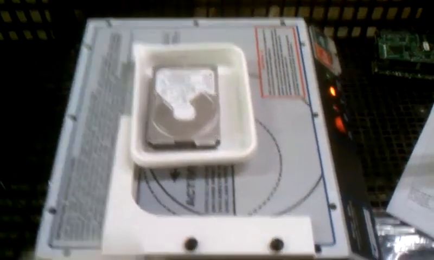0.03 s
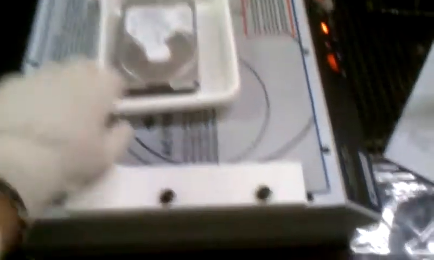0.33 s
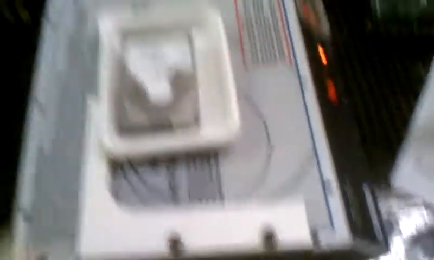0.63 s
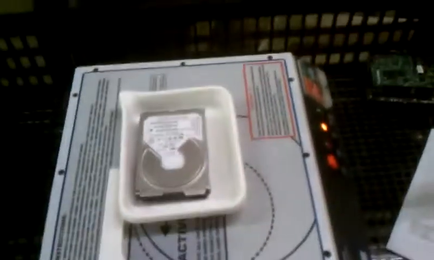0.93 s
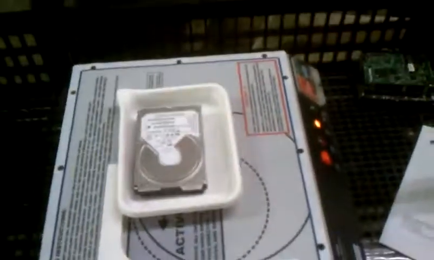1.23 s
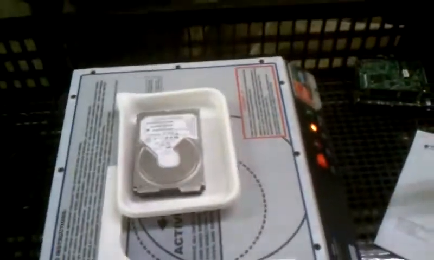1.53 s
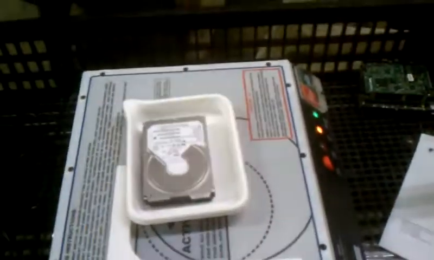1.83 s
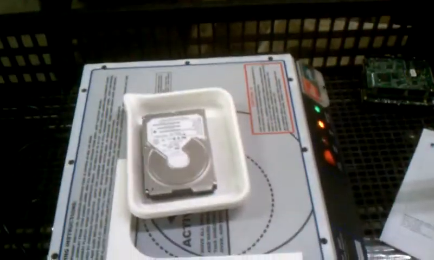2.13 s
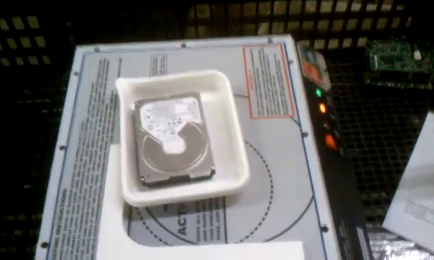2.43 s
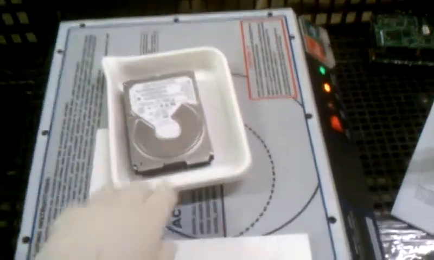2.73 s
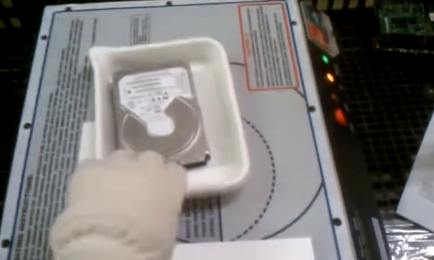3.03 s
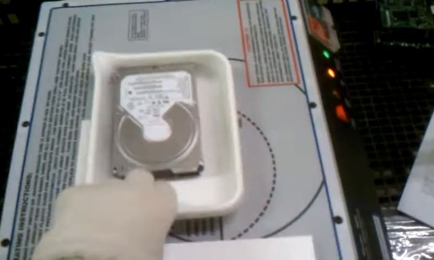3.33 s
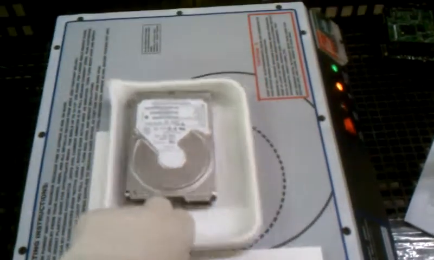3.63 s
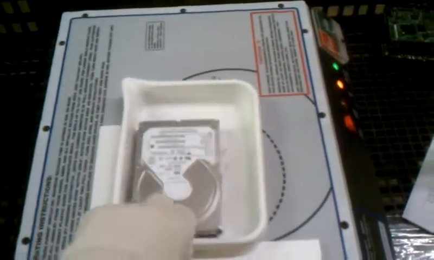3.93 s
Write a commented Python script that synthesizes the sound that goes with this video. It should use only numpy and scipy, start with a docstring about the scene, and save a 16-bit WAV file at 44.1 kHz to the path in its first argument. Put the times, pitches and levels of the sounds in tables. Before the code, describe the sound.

A rattling electric buzz starts with a thump over a whirring fan, as a magnet shakes a hard drive in a plastic tray. The buzz evens out, then the tray is dragged with scrapes and knocks, heard close in a small office.

```python
"""A cooling fan whirs in an idling bench degausser. Its mains magnet switches on with a thump and a hum,
and a hard drive in a plastic tray chatters in the field, settling into an even buzz.
A hand then drags the tray over the deck: it sticks and slips, and the drive knocks against its wall.
A narrow-band microphone is close by, in a small office."""
import sys
import numpy as np
from scipy import signal
from scipy.fft import rfft, irfft
from scipy.io import wavfile
from scipy.ndimage import uniform_filter1d

SR = 44100
rng = np.random.default_rng(int(sys.argv[2]) if len(sys.argv) > 2 else 0)


def file_out(sig):
    """Save sig as 16-bit WAV at sys.argv[1]."""
    # one column per channel
    cols = np.atleast_2d(sig).T
    # limit, then scale
    lim = np.clip(cols, -1, 1)
    pcm = np.round(lim * 32767).astype(np.int16)
    wavfile.write(sys.argv[1], SR, pcm)


N = 176400

MAINS_HZ, SWITCH_ON_S, FIELD_RISE_S = 60.05, 1.602, 0.016
STRIKE_HZ, STRIKE_PHASE_CYCLES = 2 * MAINS_HZ, 0.4
# strength of the drive's rocking (time [s], level [dB])
ROCKING_LEVEL = [(1.6, -11.5), (1.8, -14.5), (2.08, -15), (2.15, -1.5), (2.22, -4), (2.3, -8), (2.39, 2),
                 (2.423, -8.5), (2.455, 4.5), (2.49, -5), (2.53, -1.5), (2.7, -0.5), (2.93, -0.5),
                 (2.99, -21.5), (4, -32)]
# ring of the drive casing (frequency [Hz], relative density [dB])
CASING_SPECTRUM = [(100, -10.5), (300, -1.5), (480, -7.5), (560, 1.5), (720, -2), (950, -2), (1250, 6),
                   (1550, 0), (1900, 6.5), (2200, 5.5), (2450, 5), (2800, -2), (3350, 5.5), (3700, -7),
                   (4050, -19.5), (4500, -37.5)]


def undb(db):
    """Decibels to gain."""
    return 10 ** (np.asarray(db) / 20)


def unit(x):
    """Scale to rms 1."""
    return x / np.sqrt(np.mean(x ** 2))


def curve(rows):
    """Join (time [s], value) rows by straight lines."""
    return np.interp(np.arange(N) / SR, *np.array(rows).T)


def walk(rate_hz):
    """Smooth random drift, rms 1."""
    hold = int(SR / rate_hz)
    steps = np.repeat(rng.standard_normal(N // hold + 1), hold)
    return unit(uniform_filter1d(uniform_filter1d(steps, hold), hold)[:N])


def colour(x, spectrum):
    """Minimum-phase filter of unit energy through (frequency [Hz], level [dB]) rows."""
    size = 8192
    hz, db = np.array(spectrum).T
    bins_hz = np.arange(size // 2 + 1) * SR / size
    gain_db = np.interp(np.log(bins_hz + 1), np.log(hz), db)
    cepstrum = irfft(np.log(undb(gain_db)))
    cepstrum[1:size // 2] *= 2
    cepstrum[size // 2 + 1:] = 0
    response = irfft(np.exp(rfft(cepstrum)))
    return signal.fftconvolve(x, response / np.linalg.norm(response))[:N]


def tail(x, t60_s):
    """Dense, decaying reflections."""
    decay = np.exp(-np.log(1000) * np.arange(SR // 2) / SR / t60_s)
    response = rng.standard_normal(SR // 2) * decay
    return signal.fftconvolve(x, response / np.linalg.norm(response))[:N]


def pulses(times_s, sizes):
    """One click of the given size at each time."""
    return np.bincount(np.clip(times_s * SR, 0, N).astype(int), sizes, N + 1)[:N]


def bursts(clicks, decay_s):
    """Turn each click into exponentially decaying noise."""
    envelope = signal.lfilter([1], [1, -np.exp(-1 / (decay_s * SR))], clicks)
    return envelope * rng.standard_normal(N)


def fan(t):
    """Wavering blade tones and a throbbing whine over rushing air, with a fluttering high whirr."""
    # blade tones (frequency [Hz], relative level [dB])
    blade_tones = [(161.8, -52), (170.7, -49), (254.5, -50), (510.5, -48.5), (1274, -59.5)]
    # main whine (time [s], relative level [dB])
    whine_level = [(0, -52), (.3, -47.5), (.6, -42), (.9, -48.5), (1.2, -45), (1.52, -44), (1.65, -44),
                   (4, -53)]
    # rushing air (frequency [Hz], relative density [dB])
    air_spectrum = [(25, -32.5), (50, -16), (85, -6), (150, -3), (260, 0.5), (380, 0), (490, 1.5),
                    (570, -8.5), (700, -2.5), (800, 3), (900, -1), (1050, -6), (1270, -7), (1650, -9.5),
                    (1950, -7), (2200, -7.5), (2400, -6), (2700, -8), (3000, -6), (3280, -6.5), (3550, -15),
                    (4000, -25), (4500, -46)]
    # fan level as the microphone moves (time [s], gain [dB])
    proximity = [(0, -2), (.4, 0.1), (.7, -0.5), (1.3, -1), (4, -3)]
    whine_hz, throb_hz, throb_db = 763, 13, 4
    waver_db, whirr_band_hz = 3, [3110, 3450]

    def tone(hz, db):
        gain = np.sqrt(2) * undb(db + waver_db * walk(14))
        drifting_hz = hz * (1 + 0.003 * walk(12))
        return gain * np.sin(2 * np.pi * np.cumsum(drifting_hz) / SR)

    tones = sum(tone(hz, db) for hz, db in blade_tones)
    tones += tone(whine_hz, curve(whine_level) + throb_db * np.sin(2 * np.pi * throb_hz * t))
    air = colour(rng.standard_normal(N), air_spectrum) * undb(-39 + 0.5 * walk(24))
    band = signal.butter(4, whirr_band_hz, "band", fs=SR, output="sos")
    whirr = unit(signal.sosfilt(band, rng.standard_normal(N))) * undb(-55 + 3.2 * walk(25))
    return undb(curve(proximity)) * (undb(-0.86) * tones + air + whirr)


def hum(t, looseness):
    """Coil hum surges at switch-on; the rocking drive drones, unsteady if loose, and shakes the bench."""
    # hum of coil and case (mains multiple, level [dB])
    coil_harmonics = [(1, -64), (2, -48), (4, -56.5), (6, -42.5), (8, -38.5), (10, -53), (12, -58.5)]
    # drive rocking on the deck (mains multiple, relative level [dB])
    drone_harmonics = [(2, -36.5), (3, -27.5), (4, -44), (5, -36.5), (6, -43), (7, -50.5), (8, -38),
                       (10, -47)]
    # bench rumble (frequency [Hz], relative density [dB])
    bench_spectrum = [(20, -26.5), (60, -8.5), (110, 5), (250, 3.5), (500, -14), (1500, -49.5)]
    surge_db, surge_s, slip_s = 6, 0.07, 0.0005
    phases = rng.uniform(0, 2 * np.pi, size=16)

    def stack(harmonics, waver_db, clock_s):
        total = np.zeros(N)
        for k, db in harmonics:
            gain = np.sqrt(2) * undb(db + waver_db * looseness * walk(21.69))
            total += gain * np.sin(2 * np.pi * k * MAINS_HZ * clock_s + phases[round(k)])
        return total

    surge = undb(surge_db * np.exp(-np.abs(t - SWITCH_ON_S) / surge_s))
    bench = undb(-38) * colour(rng.standard_normal(N), bench_spectrum)
    drone = stack(drone_harmonics, waver_db=3.5, clock_s=t + slip_s * looseness ** 2 * walk(35))
    coil = stack(coil_harmonics, waver_db=2.5, clock_s=t)
    return surge * coil + undb(curve(ROCKING_LEVEL)) * (drone + bench)


def chatter(t, looseness):
    """The drive strikes and bounces each half cycle, shaking the tray; rocking weakens alternate hits."""
    # casing chatter (time [s], level [dB])
    casing_level = [(1.6, -29.5), (1.68, -33), (1.74, -26), (1.79, -31.5), (2.1, -30.5), (2.25, -28),
                    (2.45, -27), (2.6, -27), (2.93, -25.5), (3.12, -39), (3.25, -36), (3.32, -34),
                    (3.39, -36.5), (3.68, -44), (3.735, -29), (3.78, -34), (3.9, -27.5), (4, -31)]
    # tray shaking and sliding on the deck (time [s], level [dB])
    tray_level = [(1.6, -32), (1.65, -23), (1.79, -30), (2.1, -26), (2.2, -37), (2.35, -23), (2.5, -50.5),
                  (2.93, -31.5), (3.0, -23.5), (3.2, -27), (3.25, -31), (3.33, -27.5), (3.39, -34.5),
                  (3.71, -37.5), (3.76, -23.5), (3.83, -27.5), (3.92, -27), (4, -64)]
    # tray boom (frequency [Hz], relative density [dB])
    tray_spectrum = [(40, -30), (90, -18), (170, -9.5), (245, -5), (290, -4), (330, -10), (380, -1.5),
                     (430, 5), (480, -3.5), (530, -10), (700, -8.5), (950, -16), (2000, -27), (4400, -65)]
    index = np.arange(int(STRIKE_HZ * N / SR))
    due_s = (index + STRIKE_PHASE_CYCLES) / STRIKE_HZ
    slack = np.interp(due_s, t, looseness)
    timing_draw, level_draw = rng.standard_normal((len(index), 2)).T
    jitter_s = 0.002 * slack ** 2 * timing_draw
    scatter_db = 2.5 * slack * level_draw
    weak_db = -7.5 * np.interp(due_s, t, undb(curve(ROCKING_LEVEL))) * (index % 2)
    strikes = pulses(due_s + jitter_s, undb(scatter_db + weak_db))
    bounces = unit(bursts(strikes, decay_s=0.0092))
    blows = unit(strikes) + 1.65 * bounces
    casing = unit(colour(blows + 0.72 * tail(blows, t60_s=0.013), CASING_SPECTRUM))
    tray = unit(colour(bursts(strikes, decay_s=0.0081), tray_spectrum))
    return casing * undb(curve(casing_level)) + tray * undb(curve(tray_level))


def thumps(t):
    """The deck booms as the field grabs the drive and as the tray jolts."""
    # deck booms (time [s], pitch [Hz], level [dB], t60 [s])
    booms = [(1.606, 467, -21.5, 0.34), (1.612, 180.6, -15.5, 0.23), (1.615, 283, -23, .17),
             (1.611, 120.4, -21, .22), (1.641, 165, -21.5, 0.07), (3.333, 349, -11, 0.05),
             (3.414, 372, -10, 0.029), (3.749, 256, -17.5, 0.29), (3.804, 259.6, -15.5, 0.17)]
    attack_s = 0.0045
    deck = np.zeros(N)
    for start_s, hz, db, t60_s in booms:
        age_s = np.maximum(t - start_s, 0)
        envelope = (1 - np.exp(-age_s / attack_s)) * np.exp(-np.log(1000) * age_s / t60_s)
        deck += undb(db) * envelope * np.sin(2 * np.pi * hz * age_s)
    return deck


def slaps():
    """Now and then the drive lands hard and its casing rings."""
    # hard landings (time [s], relative level [dB])
    landings = [(1.684, -16), (1.725, -16), (1.739, -12.5), (1.758, -14.5), (1.874, -16.5), (1.924, -15.5),
                (1.949, -14.5), (1.957, -13.5), (2.001, -18), (2.058, -15), (2.087, -21.5), (2.17, -16),
                (2.219, -17), (2.239, -12), (2.253, -20), (2.269, -17.5), (2.338, -20), (2.387, -16),
                (2.402, -15), (2.452, -14), (2.469, -13), (2.519, -16), (2.933, -15.5), (2.948, -12)]
    times_s, db = np.array(landings).T
    hits = pulses(times_s, undb(db - 5.5))
    return colour(3.4 * hits + bursts(hits, decay_s=0.0028), CASING_SPECTRUM)


def scrape(t):
    """The tray sticks and slips with each push, juddering in the field."""
    # hand pushes (start [s], length [s], level [dB])
    pushes = [(2.969, 0.11, -32), (3.093, 0.035, -31), (3.13, 0.094, -29), (3.273, 0.042, -29),
              (3.312, .03, -27), (3.747, .09, -28.5), (3.843, 0.083, -28), (3.938, 0.18, -27)]
    # tray scraping on the deck (frequency [Hz], relative density [dB])
    scrape_spectrum = [(100, -20), (250, -10), (330, -9.5), (425, 10.5), (540, -4), (700, 6.5), (850, 4.5),
                       (1000, 1.5), (1230, 4.5), (1550, -2), (2250, -6), (2750, -2), (3300, 0),
                       (3700, -13.5), (4400, -35)]
    slips_per_s, edge_s, judder_db = 760, 0.013, 3.5
    slips = (rng.random(N) < slips_per_s / SR) * rng.choice([-1, 1], N)
    slips = unit(slips * undb(rng.uniform(-3.6, 3, N)))
    push = np.zeros(N)
    for start_s, length_s, db in pushes:
        inside_s = np.minimum(t - start_s, start_s + length_s - t)
        push += undb(db) * np.clip(inside_s / edge_s + 0.5, 0, 1)
    grit = unit(bursts(np.abs(slips), decay_s=0.0012))
    judder = undb(judder_db * np.cos(2 * np.pi * (STRIKE_HZ * t - STRIKE_PHASE_CYCLES)))
    friction = unit((slips + grit) * judder) * push
    return colour(friction + 0.28 * tail(friction, t60_s=0.039), scrape_spectrum)


def knocks():
    """The drive hits the tray wall: snap, short rattle and a hollow ring softened by the contact."""
    # wall hits (time [s], relative click level [dB], relative ring level [dB])
    wall_hits = [(2.987, -31, -16), (3.022, -16, -17.5), (3.059, -25, -36), (3.088, -21, -23),
                 (3.137, -17.5, -14), (3.152, -20, -21), (3.171, -25, -25), (3.188, -30, -11),
                 (3.206, -29, -12), (3.296, -27, -19), (3.314, -19, -20), (3.324, -17, -21),
                 (3.365, -20, -31), (3.387, -24, -30), (3.422, -15.5, -33), (3.457, -19, -25),
                 (3.465, -19, -12.5), (3.485, -21.5, -31), (3.507, -21, -36), (3.516, -16.5, -31),
                 (3.541, -13, -6), (3.563, -18.5, -21), (3.607, -14, -12), (3.6322, -15, -29),
                 (3.640, -13.5, -17.5), (3.746, -16.5, -14.5), (3.755, -23.5, -21), (3.763, -14.5, -28),
                 (3.772, -38, -19), (3.791, -21.5, -8.5), (3.808, -15, -14.5), (3.821, -22, -14),
                 (3.839, -18.5, -21), (3.857, -14.5, -22), (3.866, -21, -27), (3.876, -15, -22),
                 (3.894, -18, -14.5), (3.908, -20, -33), (3.918, -18, -19), (3.957, -16, -16),
                 (3.969, -25, -18)]
    # clack of drive and tray (frequency [Hz], relative density [dB])
    clack_spectrum = [(100, -20.5), (300, -10), (480, -0.5), (720, -4), (1020, -3), (1260, 5.5),
                      (1550, -5.5), (2250, 4.5), (2700, -2), (3300, 3.5), (3700, -9.5), (4400, -37)]
    # hollow modes of the plastic tray (frequency [Hz], gain [dB], t60 [s])
    tray_modes = [(440, -25, .07), (675, -2.5, 0.024), (890, -14.5, .028), (1247, -5, .042),
                  (2145, -22.5, 0.013), (3226, -24, .04)]
    contact_hz = 3100
    times_s, click_db, ring_db = np.array(wall_hits).T
    hits = pulses(times_s, undb(click_db - 3))
    clicks = 3.8 * hits + bursts(hits, decay_s=0.0032)
    clack = colour(clicks + 0.48 * tail(clicks, t60_s=0.045), clack_spectrum)
    contact = signal.butter(8, contact_hz, fs=SR, output="sos")
    blows = signal.sosfilt(contact, pulses(times_s, undb(ring_db - 2.5)))
    ring = np.zeros(N)
    for hz, db, t60_s in tray_modes:
        pole = np.exp((2j * np.pi * hz - np.log(1000) / t60_s) / SR)
        ring += undb(db) * signal.lfilter([1], [1, -pole], blows).real
    return clack + ring


def tick():
    """One thin, bright tick: a click with a gentle treble roll-off."""
    time_s, corner_hz = 3.4235, 1000
    click = pulses(np.array([time_s]), undb([1.5]))
    return signal.sosfilt(signal.butter(1, corner_hz, fs=SR, output="sos"), click)


def scene():
    """Fan, magnet and handling in a small office."""
    # evenness of the drive's strikes (time [s], share [0-1])
    evenness = [(1.6, .1), (2.1, 0.18), (2.46, .2), (2.54, 0.82), (2.78, 0.84), (2.86, .6), (3.0, .2),
                (4, 0.09)]
    room_db, room_t60_s = -16, 0.16
    t = np.arange(N) / SR
    looseness = 1 - np.clip(curve(evenness), 0, 1)
    field = np.clip((t - SWITCH_ON_S) / FIELD_RISE_S, 0, 1)
    rattle = field * chatter(t, looseness) + thumps(t) + slaps() + scrape(t) + knocks()
    machine = fan(t) + field * hum(t, looseness)
    room = undb(room_db) * tail(rattle, room_t60_s)
    return (machine + rattle + room)[None]


def record(dry):
    """A narrow-band microphone, with the tick on top and a steep final low-pass."""
    mic_hz, edge_hz, top_hz = 4500, 900, 15900
    taps = int(5 * SR / edge_hz) | 1
    mic = signal.firwin(taps, mic_hz, window=("kaiser", 8), fs=SR)
    heard = signal.fftconvolve(dry, mic[None], "same")
    top_cut = signal.ellip(8, 0.2, 80, top_hz, fs=SR, output="sos")
    return signal.sosfilt(top_cut, heard + tick())


dry = scene()
out = record(dry)
file_out(out)
```